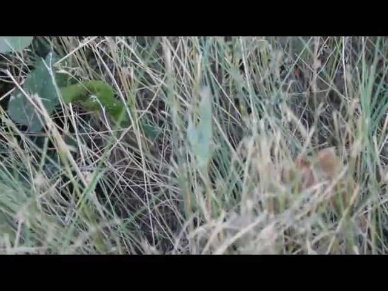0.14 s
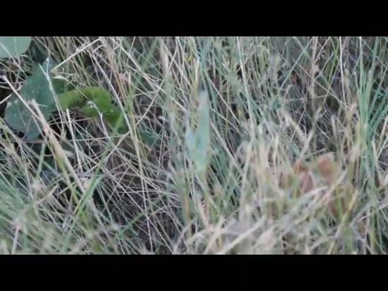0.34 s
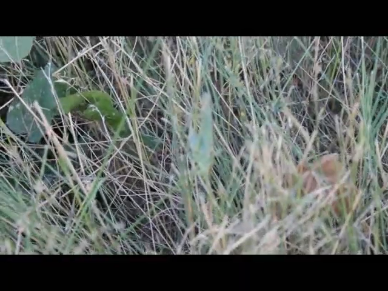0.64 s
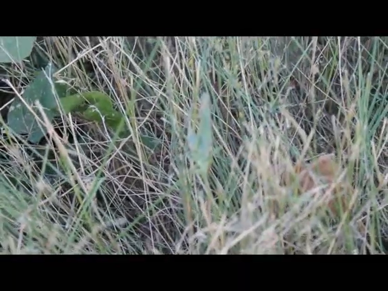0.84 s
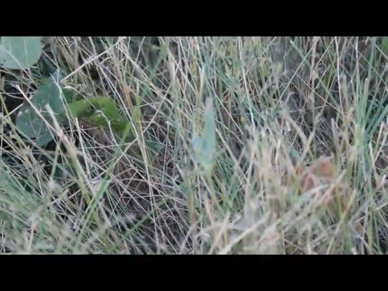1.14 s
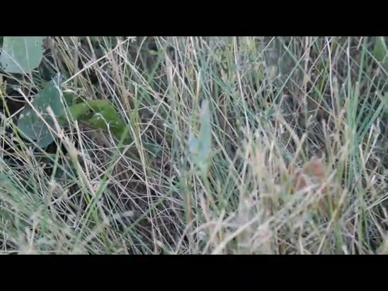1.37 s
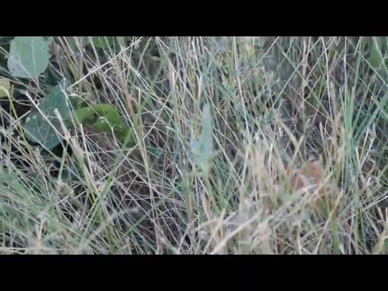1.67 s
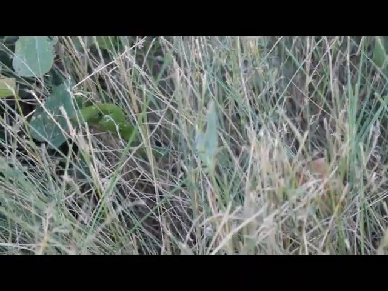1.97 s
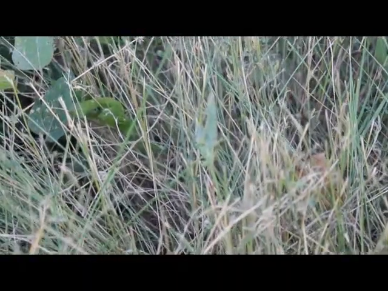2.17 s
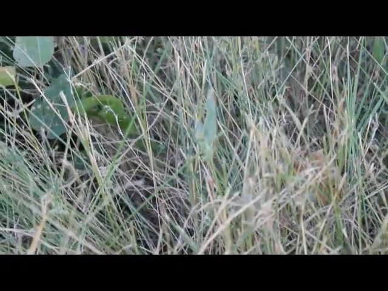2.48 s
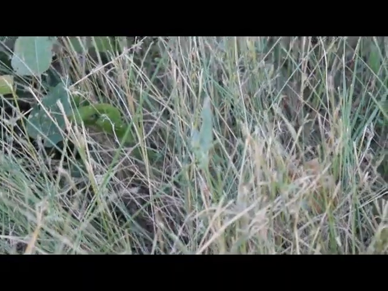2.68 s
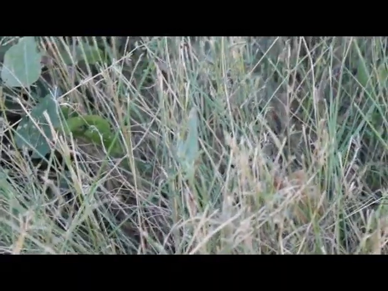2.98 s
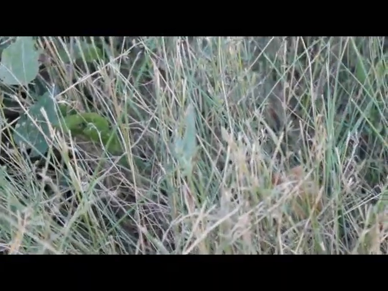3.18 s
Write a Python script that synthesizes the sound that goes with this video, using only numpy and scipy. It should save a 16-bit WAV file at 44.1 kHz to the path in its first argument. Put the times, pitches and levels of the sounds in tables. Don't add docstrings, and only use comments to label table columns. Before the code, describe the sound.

A bush-cricket trills close by in tall grass, an unbroken, very high, raspy buzz from start to end; far fainter cricket chirps and a distant second trill lie behind. One close microphone, right channel only.

```python
import sys
import numpy as np
from scipy import signal
from scipy.fft import rfft, irfft, next_fast_len
from scipy.io import wavfile
from scipy.ndimage import uniform_filter1d, map_coordinates

SR = 44100
rng = np.random.default_rng(int(sys.argv[2]) if len(sys.argv) > 2 else 0)


def dump(signal):
    limited = np.clip(np.atleast_2d(signal).T, -1, 1)
    pcm = np.round(limited * 32767).astype(np.int16)
    wavfile.write(sys.argv[1], SR, pcm)


def linear_from_db(decibels):
    return 10 ** (np.asarray(decibels, float) / 20)


N = 146412


def unit(x):
    return x / np.sqrt(np.mean(x ** 2) + 1e-20)


def wobble(rate):
    points = rng.standard_normal(int(N * rate / SR) + 4)
    return map_coordinates(points, [np.arange(N) * rate / SR])


def filtered(x, response):
    size = next_fast_len(N + 8192)
    hz = np.fft.rfftfreq(size, 1 / SR)
    return irfft(rfft(x, size) * response(hz), size)[:N]


def rush(points):
    point_hz, point_db = np.transpose(points)

    def colour(hz):
        return linear_from_db(np.interp(np.log(hz + 1), np.log(point_hz), point_db, -120, -120))

    return unit(filtered(rng.standard_normal(N), colour))


def place(start_s, shapes, size):
    first = np.floor(start_s * SR).astype(int)
    index = first[:, None] + np.arange(size)
    wave = shapes(np.maximum(index / SR - start_s[:, None], 0))
    inside = (index >= 0) & (index < N)
    return np.bincount(index[inside], wave[inside], N)


def snap(t, hz, ring_s):
    u = t / ring_s
    swell = (u / 3) ** 3 * np.exp(3 - u)
    return swell * np.sin(2 * np.pi * hz * t * (1 - 0.044 * u / 10))


def scatter(x, t60_s):
    t = np.arange(SR // 12) / SR
    part = np.arange(N) * 40 // N
    tails = rng.standard_normal((40, len(t))) * linear_from_db(-60 * t / t60_s)
    out = np.zeros(N + SR)
    for k, tail in enumerate(tails):
        at = np.flatnonzero(part == k)
        echo = signal.fftconvolve(x[at], tail / np.linalg.norm(tail))
        out[at[0]:][:len(echo)] += echo
    delay_s = .0006
    return np.roll(out, round(delay_s * SR))[:N]


def singer():
    anchor_s = wing_cycles()
    direct = closings(anchor_s) + openings(anchor_s)
    return direct + linear_from_db(-15) * scatter(direct, .032)


def wing_cycles():
    # time_s, lag_ms
    lag = [(0.09, -1), (0.16, -3.5), (0.69, -4), (0.84, 0.8), (0.92, -0.3), (1.07, 2.5), (1.22, 1),
           (1.37, 1.6), (1.45, 1.0), (1.52, 2), (1.6, 1.4), (1.82, -0.1), (1.97, 0), (2.05, -0.6),
           (2.35, -2), (2.8, 2.1), (2.88, -0.6), (3.25, -1.8)]
    cycle_s, first_s = .07538, .088
    steady = first_s + cycle_s * np.arange(-1, 45)
    return steady + np.interp(steady, *np.transpose(lag)) / 1000


def closings(anchor_s):
    # outer_end_ms (last strike of the first, of the second), teeth, first_gap_ms, last_gap_ms,
    # slowing_power
    timing = [
        (-10.6, 12.5, 1.1, 2.1, 2.4),
        (15.2, 9.4, 1.05, 2.4, .9),
    ]
    # first_tooth_db, light_db, light_at_share, full_db, full_at_share, last_tooth_db
    force = [
        (-21, -14, .38, -4, .58, -5),
        (-7.5, -4, .2, -4, .4, -7.5),
    ]
    # first_pitch_hz, last_pitch_hz, first_ring_ms, last_ring_ms
    wing_ring = [
        (11040, 11240, 0.0555, .135),
        (11170, 11830, 0.089, 0.1463),
    ]
    out = np.zeros(N)
    for second in range(2):
        strike_ms, along, luck = tooth_strikes(len(anchor_s), second, timing[second])
        struck = along[1]
        u, luck = along[0][struck][:, None], luck[struck]

        db0, light_db, light, db, full, db1 = force[second]
        hz0, hz1, ring0, ring1 = wing_ring[second]
        force_db = np.interp(u, [0, light, full, 1], [db0, light_db, db, db1])
        gain = linear_from_db(force_db + 0.16 * luck[:, 1:2])
        hz = (hz0 + (hz1 - hz0) * u) * (1 + 0.039 * luck[:, 2:3])
        ring_ms = (ring0 + (ring1 - ring0) * np.clip(u, 0, 1)) * np.exp(.15 * luck[:, 3:4])
        ring_s = ring_ms / 1000

        def strike(t):
            return gain * (snap(t, hz, ring_s) + side_ring(t, u, luck))

        start_s = (anchor_s[:, None] + strike_ms / 1000)[struck] - 3 * ring_s[:, 0]
        out += place(start_s, strike, size=200)
    return out


def tooth_strikes(cycles, second, timing):
    end, teeth, gap0, gap1, power = timing
    luck = rng.standard_normal((cycles, 20, 6))
    count = teeth + 0.66 * luck[:, :1, 4]
    k = np.arange(20)
    u = k / (count - 1) if second else 1 - k / (count - 1)
    gaps = (gap0 + (gap1 - gap0) * np.clip(u, 0, 1) ** power) * np.exp(0.12 * luck[..., 0])
    ms = np.cumsum(gaps, 1) - gaps
    shift_ms = 0.79 * luck[:, :1, 5]
    if second:
        last = np.clip(np.round(count[:, 0]) - 1, 1, 19).astype(int)
        span = ms[np.arange(cycles), last][:, None]
        ms = ms * (end + 1.2 * shift_ms) / span
    else:
        ms = end + shift_ms - ms
    return ms, (u, k < np.round(count)), luck


def side_ring(t, u, luck):
    # pitch_hz, level_db, ring_ms
    modes = [(12800, -1, .11), (13150, -42, 0.065), (9430, -11.5, 0.12), (7580, -39, 0.33),
             (4744, -32.5, 0.18), (2750, -42, 0.29)]
    out = 0
    for hz, db, ring_ms in modes:
        gain = linear_from_db(db - 7 * u + 1.35 * luck[:, 4:5])
        out = out + gain * snap(t, hz * (1 + 0.068 * luck[:, 5:]), ring_ms / 1000)
    return out


def openings(anchor_s):
    # start_ms from the anchor, length_ms, pitch_hz, level_db, scatter_db
    strokes = [
        (-36.6, 6, 9000, -23, .8),
        (-30.4, 1.6, 9900, -26, 3),
        (-9, 4, 10400, -27, 2),
        (-6, 5, 9950, -23.5, 1.5),
    ]
    # time_s, level_db
    effort = [(0.05, -3), (0.2, -1), (0.43, -1), (0.88, 4.5), (0.96, -5), (1.41, -7), (1.49, -10),
              (1.79, -5), (1.86, 6), (2.01, 1), (2.24, 5), (2.39, 0), (2.47, 1.0), (2.77, -8), (2.84, 2),
              (3.29, -2)]
    # pitch_hz, level_db per Hz
    scrape = [(7300, -12), (8500, -5), (9800, 3), (11000, -6.5), (12500, -15)]
    out = np.zeros(N)
    effort_db = np.interp(anchor_s + strokes[0][0] / 1000, *np.transpose(effort))[:, None]
    for start_ms, length_ms, hz, db, scatter_db in strokes:
        luck = rng.standard_normal((len(anchor_s), 4))
        gain = linear_from_db(db + effort_db + scatter_db * luck[:, :1])
        rub_gain = linear_from_db(-4.5 - 1.1 * effort_db + 3.5 * luck[:, 2:3])

        def stroke(t):
            done = np.clip(t * 1000 / length_ms, 0, 1)
            return gain * np.sin(np.pi * done ** .7) ** .7

        pitch = hz * (1 + .025 * (wobble(400) + .5 * wobble(14)))
        tone = np.sin(2 * np.pi * np.cumsum(pitch) / SR) * linear_from_db(2.6 * wobble(1100))
        start_s = anchor_s + (start_ms + .5 * luck[:, 1]) / 1000
        rub = place(start_s, lambda t: stroke(t) * rub_gain, size=400)
        out += tone * place(start_s, stroke, size=400) + rub * rush(scrape)
    return out


def cricket():
    # start_s, length_s, level_db
    chirps = [(-.03, .09, -46), (.18, .08, -42), (.385, .09, -44), (.58, .12, -44), (.79, .115, -45),
              (.99, .08, -46), (1.17, .11, -44), (1.4, .11, -44), (1.59, .09, -45), (1.79, .11, -44),
              (1.98, .08, -44), (2.16, .11, -45), (2.36, .1, -45), (2.56, .09, -44), (2.76, .07, -46),
              (2.95, .1, -46), (3.17, .1, -46)]
    # pitch_hz, width_hz, level_db
    body = [
        (5116, 1100, 0.5),
        (2368, 420, -5.5),
        (3080, 940, -10.5),
    ]
    t = np.arange(N) / SR
    level = np.zeros(N)
    for start, length, db in chirps:
        rise = (t - start) / (.3 * length) + 0.54 * (t > start)
        fall = (start + length - t) / (.2 * length) + .5
        level += linear_from_db(db + 1) * np.clip(np.minimum(rise, fall), 0, 1)

    pulse_hz = 200 * (1 + 0.0416 * wobble(60))
    pulses = np.sin(np.pi * np.cumsum(pulse_hz) / SR) ** 4 * linear_from_db(4.5 * wobble(120))
    tone_hz = body[0][0] * (1 + 0.055 * wobble(330))
    tone = np.sin(2 * np.pi * np.cumsum(tone_hz) / SR)

    def resonance(f):
        return sum(linear_from_db(db) * (1j * f * w / (c * c - f * f + 1j * f * w)) ** 3 for c, w, db in body)

    rough = unit(filtered(pulses * rng.standard_normal(N), resonance))
    voice = level * unit(rough + 1.3 * unit(pulses * tone))
    return voice + linear_from_db(-2.5) * scatter(voice, 0.063)


def far_bush_cricket():
    # pitch_hz, level_db per Hz
    colour = [(6500, -32), (7500, -16), (9700, 0), (11000, -1), (12500, -6), (14000, -9), (15500, -11)]
    cycle_s, rest_s = .0714, 1.625
    turn = np.pi * (np.arange(N) / SR - rest_s) / cycle_s
    stroke_db = -11 * np.cos(turn) ** 6 - 17 * np.cos(turn + 3.3) ** 20
    swell_db = 3.5 * wobble(25.28) + 1.24 * wobble(500)
    return linear_from_db(-36 + stroke_db + swell_db) * rush(colour)


def stem_ticks():
    # start_s, level_db, pitch_hz
    ticks = [
        (.143, -43, 935),
        (1.646, -38, 170),
        (1.646, -37.5, 1500),
        (2.108, -38.5, 970),
    ]
    start_s, db, hz = np.transpose(ticks)
    return place(start_s, lambda t: linear_from_db(db)[:, None] * snap(t, hz[:, None], 0.00061), size=900)


def far_chorus():
    # pitch_hz, level_db per Hz
    colour = [(1900, -15.5), (2400, -8), (3200, -10), (3750, -15), (4800, 3.5), (5500, -1), (6200, -11),
              (7000, -67)]
    return linear_from_db(-47.5 + 3.5 * wobble(250) + 1.8 * wobble(12)) * rush(colour)


def hiss():
    # pitch_hz, level_db per Hz
    colour = [(15, -35), (25, -4.5), (461, -2), (654, -9), (1730, -9.5), (2000, -13), (2600, -13),
              (4400, -120)]
    return linear_from_db(-64 + 0.5 * wobble(6)) * rush(colour)


def scene():
    mono = singer() + cricket() + far_bush_cricket() + stem_ticks() + far_chorus() + hiss()
    return np.array([mono, mono])


def low_pass(x):
    return signal.sosfilt(signal.butter(12, 15910, fs=SR, output="sos"), x)


def record(dry):
    ceiling, bass_hz, top_hz = .85, 90, 15700
    x = dry[1] / (1 + np.abs(dry[1] / ceiling) ** 4) ** (1 / 4)
    thud = filtered(x * x, lambda hz: 1 / (1 + 1j * hz / 2840) ** 2)
    low_noise = filtered(rng.standard_normal(N), lambda hz: 1 / (1 + (hz / 2700) ** 4))
    fizz = linear_from_db(-25.5) * uniform_filter1d(np.abs(x), size=40) * low_noise

    def band(hz):
        return 1j * hz / (bass_hz + 1j * hz) / np.sqrt(1 + (hz / top_hz) ** 20)

    right = filtered(x - 0.012 * thud + fizz, band)
    return low_pass(np.array([0 * right, right]))


dry = scene()
out = record(dry)
dump(out)
```